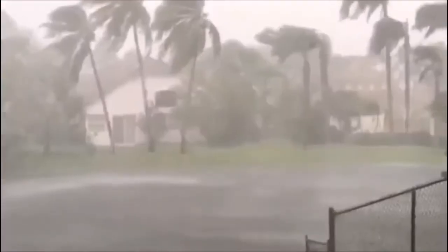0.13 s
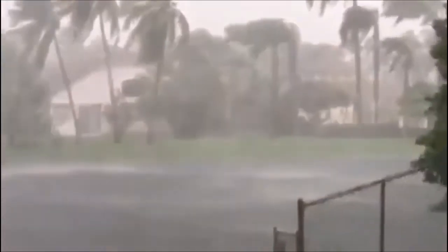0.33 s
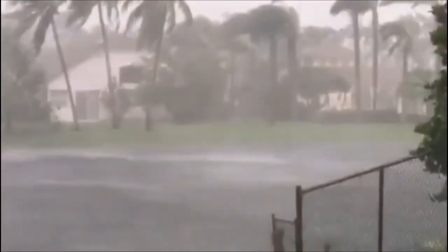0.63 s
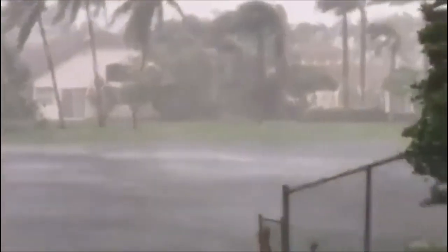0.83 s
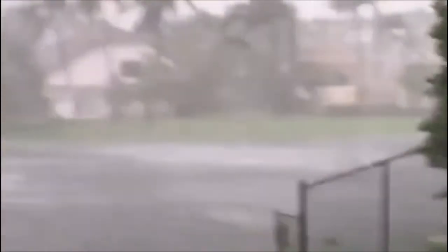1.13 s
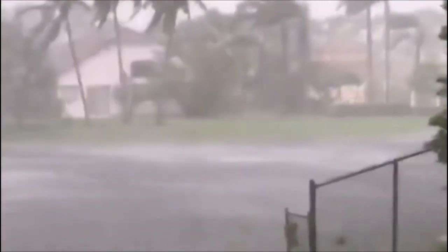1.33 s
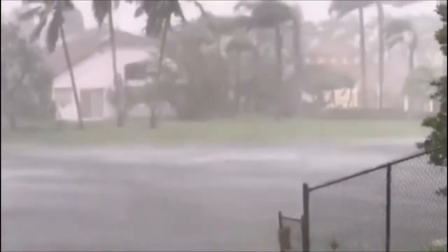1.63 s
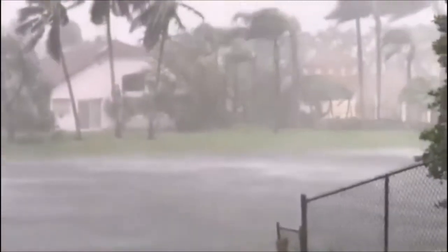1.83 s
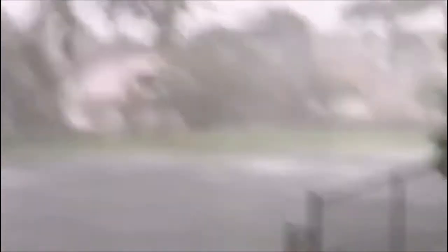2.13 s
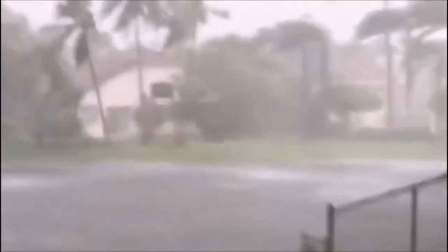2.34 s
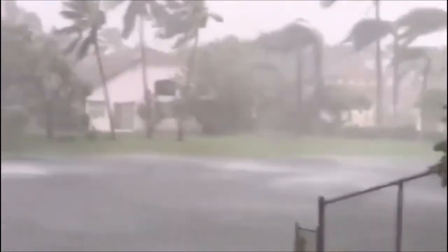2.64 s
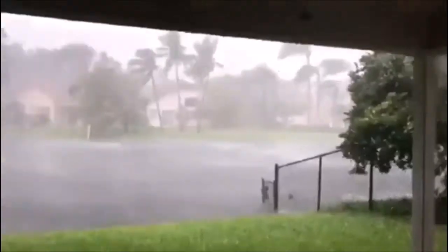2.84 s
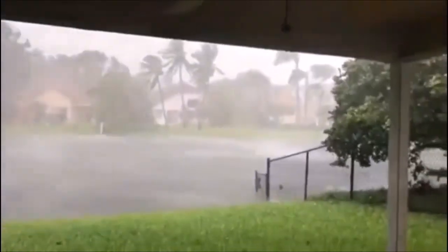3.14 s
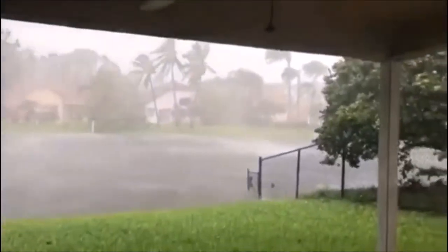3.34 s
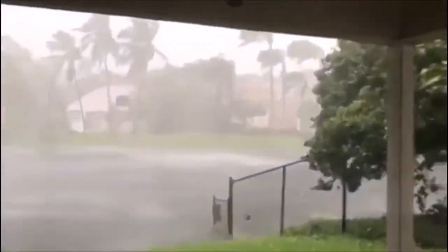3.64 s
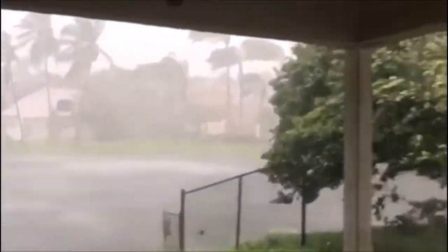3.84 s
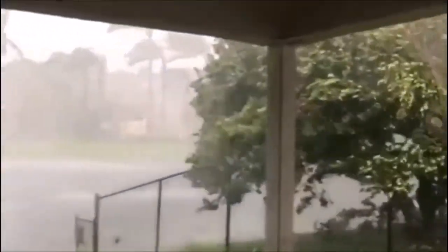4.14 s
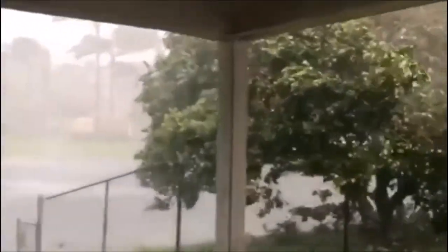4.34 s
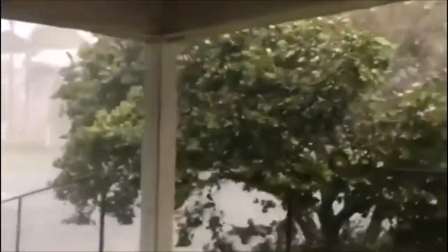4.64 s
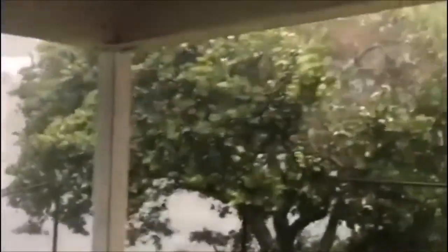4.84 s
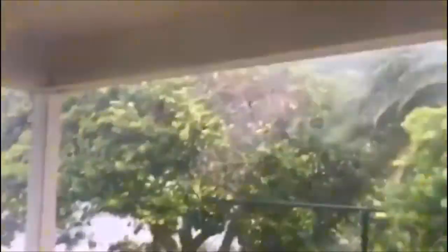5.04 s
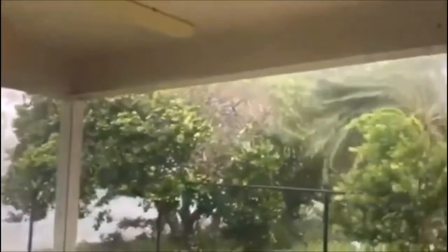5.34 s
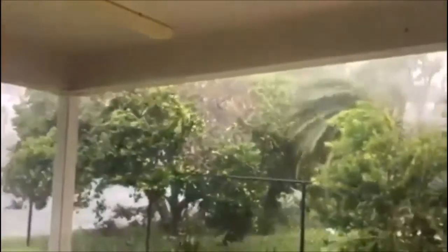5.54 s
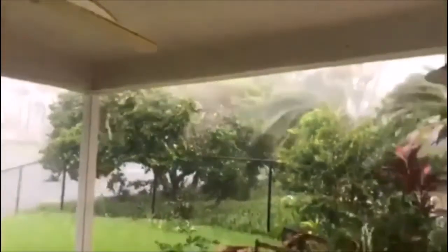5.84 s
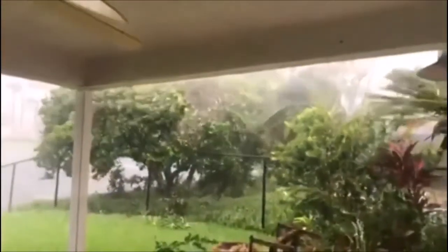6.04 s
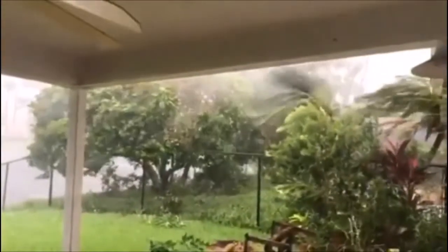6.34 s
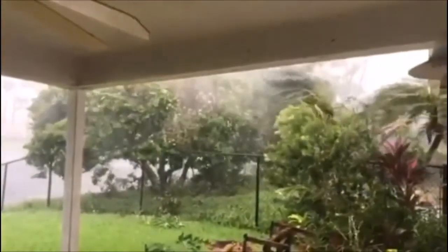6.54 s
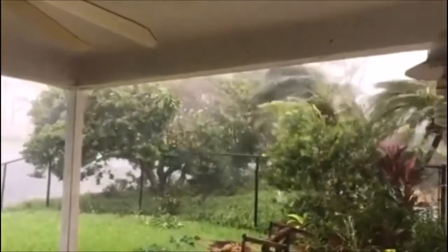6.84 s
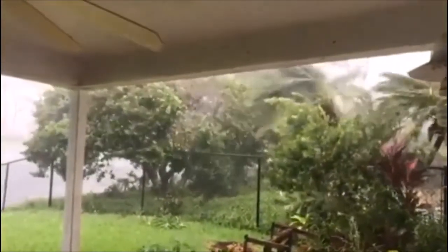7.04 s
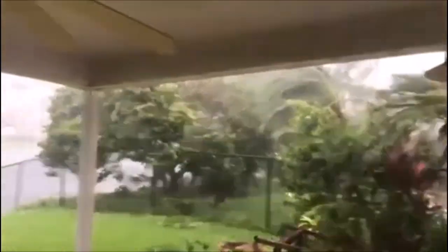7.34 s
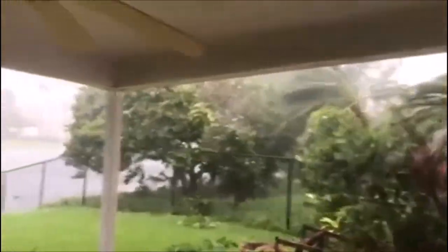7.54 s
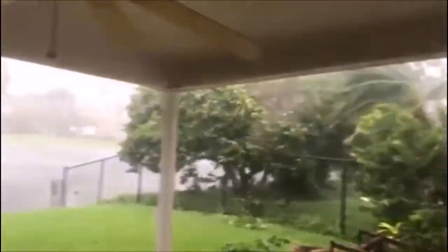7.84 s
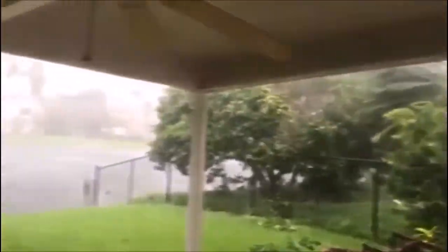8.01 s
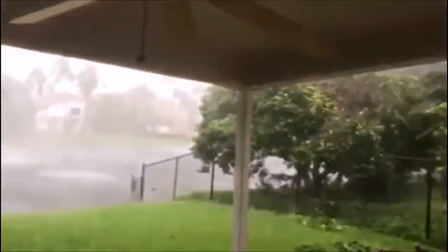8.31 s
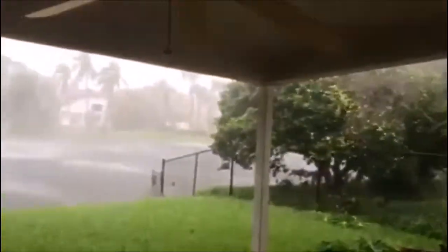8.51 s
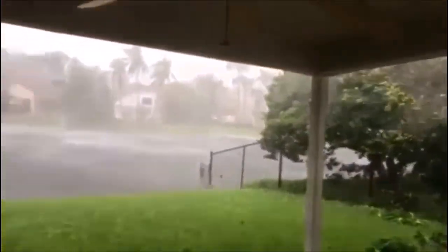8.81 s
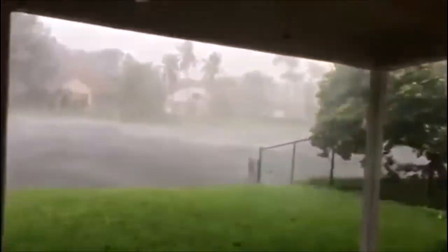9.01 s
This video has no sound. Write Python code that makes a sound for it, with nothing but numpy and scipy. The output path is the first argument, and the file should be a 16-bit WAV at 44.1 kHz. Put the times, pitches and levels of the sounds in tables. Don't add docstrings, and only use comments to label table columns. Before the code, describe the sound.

A continuous storm heard from under a porch roof beside a lawn and wide water, on one phone microphone, almost mono. From 0 to 3 seconds the wash is steady and somewhat softer: low wind rumble, mid-range roar of trees, dense grainy rain and bright spray hiss, with a faint, wavering low generator hum far away. From about 3.3 it gets louder, fullest between 4.7 and 6.3, with a heavy low gust and thump near 5.8. It eases from 6.6, quietest around 7.2, and low rumble drops near 6.9. At 7.7 rain surges back with a thump. Between 8.0 and 8.95 several short dull gust thumps hit the microphone, strongest about 8.6; low rumble then falls while the roar continues to the end, just past 9. Noise suppression makes everything shimmer waterily, with momentary thin whistling artifacts and muted treble above ten kilohertz.

```python
import sys
import numpy as np
from scipy import signal
from scipy.fft import rfft, irfft, next_fast_len
from scipy.io import wavfile
from scipy.ndimage import uniform_filter1d, map_coordinates

SR = 44100
rng = np.random.default_rng(int(sys.argv[2]) if len(sys.argv) > 2 else 0)


def persist_wave(psi):
    counts = np.round(np.clip(psi, -1, 1) * 32767).astype(np.int16)
    wavfile.write(sys.argv[1], SR, np.atleast_2d(counts).T)


def ratio(d):
    e = np.asarray(d, float) / 20
    return 10 ** e


N = 404397

HOP = 1024
PHONE_SR, PHONE_START = 48000, 474


def at_hz(points, hz):
    points = np.array(points)
    return np.interp(np.log(hz + 1), np.log(points[:, 0]), points[:, 1])


def rms_one(x):
    return x / np.sqrt(np.mean(x ** 2) + 1e-20)


def drift(rate):
    knots = rng.standard_normal(400)
    places = np.arange(0, N, 16) / SR * rate + 2
    return rms_one(map_coordinates(knots, [places], order=3)).repeat(16)[:N]


def swells(rows):
    t = np.arange(N) / SR
    return sum(db * np.cos(np.pi / 2 * np.clip((t - s) / half_s, -1, 1)) ** 2 for s, db, half_s in rows)


def patchy(source, spectrum, shared_db, own_db, rate):
    size = next_fast_len(N)
    hz = np.arange(size // 2 + 1) * SR / size
    lines = rfft(source, size) * ratio(at_hz(spectrum, hz))
    half_octave = 2 * np.log2(hz + 1)
    lowest, highest = int(2 * np.log2(spectrum[0][0])), int(2 * np.log2(spectrum[-1][0])) + 1
    together = drift(rate / 2)
    out = np.zeros(N)
    for k in range(lowest, highest + 1):
        share = np.cos(np.pi / 2 * np.clip(half_octave - k, -1, 1)) ** 2
        band = irfft(lines * share, size)[:N]
        out += band * ratio(shared_db * together + own_db * drift(rate))
    return rms_one(out)


def drops(per_s, spread_db, share):
    sizes = ratio(spread_db * np.minimum(rng.exponential(1, N), 4)) * rng.choice([-1, 1], N)
    near = rms_one(sizes * (rng.random(N) < per_s / SR))
    return np.sqrt(share) * near + np.sqrt(1 - share) * rng.standard_normal(N)


# time in seconds, wind in the trees in dB, rain on leaves and water in dB.
STORM_LEVELS = [(0.0, -33.5, -34), (0.5, -34.5, -34.5), (1.17, -33.5, -32.5), (1.63, -34.5, -34),
                (2.1, -33.5, -34), (2.45, -34, -34), (2.83, -34, -33.5), (3.47, -32, -31),
                (4.14, -32, -31.5), (4.7, -30, -29.5), (5.6, -30.5, -30), (6.25, -30.5, -29.5),
                (6.64, -32.5, -32), (7.25, -34, -34), (7.71, -31.5, -29.5), (7.9, -32, -31),
                (8.53, -30.5, -32), (9.17, -31, -31)]


def storm_level(mean_db, windy, rainy):
    s, wind_db, rain_db = np.transpose(STORM_LEVELS)
    t = np.arange(N) / SR
    wind_swing_db = np.interp(t, s, wind_db) + 32
    rain_swing_db = np.interp(t, s, rain_db) + 31.5
    return ratio(mean_db + windy * wind_swing_db + rainy * rain_swing_db)


# centre in seconds, change in dB, half length in seconds.
EDDY_SWELLS = [(3.19, 2, .15), (3.4, 5, .06), (3.8, 3, 0.1), (4.24, 2, .1), (4.6, 3.5, .15),
               (5.82, 7.5, 0.1), (5.9, -3, 0.065), (6.2, -4, .08), (6.4, 3, .15), (7.65, -1, 0.093),
               (8.52, 4, .08), (4.85, -2, .1), (1.2, -3, 0.17), (2.1, -6.5, 0.16), (6.92, -10, .1),
               (8.02, 7, .07), (8.12, -5, .08), (8.63, 3, 0.1), (8.73, -10, .06), (8.93, 2.5, .08),
               (9.17, -10, 0.21), (5.25, -2.5, .2)]


def eddies():
    return swells(EDDY_SWELLS)


# frequency in Hz, level in dB per Hz.
BUFFET_SPECTRUM = [(15, -36), (25, -17), (57, 3), (135, -0.5), (180, -28), (300, -120)]


def buffeting(eddy_db):
    air = patchy(rng.standard_normal(N), BUFFET_SPECTRUM, shared_db=0.75, own_db=-0.1, rate=8.0)
    return storm_level(-35.5, windy=0.57, rainy=0.01) * ratio(eddy_db) * air


# frequency in Hz, level in dB per Hz.
RUMBLE_SPECTRUM = [(79, -32), (135, -2), (188, -3.5), (247, -3.5), (307, -6.5), (350, -5), (450, -13.5),
                   (580, -43), (990, -120)]


def house_rumble(eddy_db):
    air = patchy(rng.standard_normal(N), RUMBLE_SPECTRUM, shared_db=-0.1, own_db=0.4, rate=8.0)
    return storm_level(-35, windy=1.2, rainy=0.01) * ratio(0.3 * eddy_db) * air


# frequency in Hz, level in dB per Hz.
TREES_SPECTRUM = [(260, -28), (450, -5), (667, -0.5), (760, -2.5), (1100, 0), (1730, -1.5), (2000, -7.5),
                  (2600, -40), (4400, -120)]


def trees():
    leaves = drops(per_s=1500.0, spread_db=1.7, share=0.1)
    roar = patchy(leaves, TREES_SPECTRUM, shared_db=0.24, own_db=0.5, rate=12.0)
    return storm_level(-32, windy=1.01, rainy=0.01) * roar


# frequency in Hz, level in dB per Hz.
RAIN_SPECTRUM = [(1180, -36), (2000, 0), (4250, -2), (4900, -8.5), (6370, -31.5), (10800, -120)]


def rain():
    patter = patchy(drops(per_s=3000.0, spread_db=2.5, share=0.16), RAIN_SPECTRUM,
                    shared_db=-0.05, own_db=0.8, rate=18.0)
    return storm_level(-33, windy=0.23, rainy=0.6) * patter


# frequency in Hz, level in dB per Hz.
SPRAY_SPECTRUM = [(2880, -32.5), (4900, -2.5), (5980, -0.5), (7670, -4.5), (9150, -4.5), (10200, -9),
                  (13400, -46), (22000, -120)]


def spray():
    hiss = patchy(drops(per_s=5000.0, spread_db=2.8, share=0.15), SPRAY_SPECTRUM,
                  shared_db=0.5, own_db=1.3, rate=22.0)
    return storm_level(-35.5, windy=-0.2, rainy=1.4) * hiss


# order (multiple of the firing rate), level in dB re the hum level, wavering in dB.
HUM_ORDERS = [(2, -2, 2), (4, -2, 1.5), (5, -2, 2), (6, -9, 2), (7, -10, 2), (8, -9, 2), (9, -10, 2)]
# order, centre in seconds, change in dB, half length in seconds.
ORDER_SWELLS = [(2, 3.9, 5, 1.3), (2, 7, -8, 2.5), (4, 1.26, 4.5, .2), (4, 1.75, -11, .2), (4, 2.4, 4, 1.1),
                (4, 5.2, -6, 0.83), (4, 8.1, -7.5, 1.6), (5, 9.1, -12, .6), (5, 7.5, -2, .3),
                (5, 1.1, -6, 1.5), (5, 4.9, 4.5, 0.7), (5, 6.3, -6, 0.67), (6, .9, 6, 0.98),
                (9, 0.63, 4, 0.65)]


def generator():
    firing_hz, hum_db = 124.2 / 4, -42
    turns = firing_hz * np.arange(N) / SR
    hum = np.zeros(N)
    for order, db, waver_db in HUM_ORDERS:
        swell_db = swells([row[1:] for row in ORDER_SWELLS if round(row[0]) == order])
        level = ratio(hum_db + db + swell_db + waver_db * drift(2.5))
        hum += np.sqrt(2) * level * np.sin(2 * np.pi * (order * turns + rng.random()))
    return hum


def lapped(x, start, count):
    n = np.arange(2 * HOP)
    window = np.sin(np.pi * (n + .5) / 2 / HOP)
    waves = np.cos(np.pi / HOP * np.outer(np.arange(count) + .5, n + .5 + HOP / 2))
    basis = waves * np.sqrt(2 / HOP) * window
    blocks = np.r_[np.zeros(HOP - start), x, np.zeros(2 * HOP)]
    blocks = blocks[:len(blocks) // HOP * HOP].reshape(-1, HOP)
    return np.hstack([blocks[:-1], blocks[1:]]) @ basis.T, basis


def overlap(lines, basis, start, size):
    frames = lines @ basis
    rising = np.r_[frames[:, :HOP].ravel(), np.zeros(HOP)]
    falling = np.r_[np.zeros(HOP), frames[:, HOP:].ravel()]
    return (rising + falling)[HOP - start:HOP - start + size]


def suppressor(lines):
    power = lines ** 2 + 1e-12
    near = uniform_filter1d(uniform_filter1d(power, size=3, axis=1), size=2, axis=0)
    steady = uniform_filter1d(uniform_filter1d(power, size=25, axis=1), size=5, axis=0)
    depth = np.interp(np.arange(lines.shape[1]), [15, 50, 90, 250, 400], [.03, .15, .23, .2, .08])
    return lines * (near / steady) ** depth


# start in seconds, low edge in Hz, high edge in Hz.
SPLIT_BANDS = [(0.131, 6900.0, 8300.0), (0.92, 5700.0, 6900.0), (1.013, 8200.0, 9700.0),
               (1.129, 5600.0, 6900.0), (1.617, 4200.0, 5200.0), (1.78, 4200.0, 5200.0),
               (2.941, 4200.0, 5200.0), (3.01, 6200.0, 8300.0), (3.637, 4600.0, 6300.0),
               (3.684, 5100.0, 6900.0), (3.823, 5600.0, 6900.0), (4.078, 5600.0, 7600.0),
               (4.287, 6900.0, 10300.0), (4.705, 4200.0, 5200.0), (4.798, 5100.0, 6900.0),
               (4.798, 8900.0, 10400.0), (4.961, 6900.0, 8300.0), (5.146, 8900.0, 10300.0),
               (6.307, 8900.0, 10400.0), (6.795, 5600.0, 6900.0), (7.05, 4200.0, 5200.0),
               (7.167, 5100.0, 6300.0), (7.956, 6200.0, 8300.0), (9.14, 4200.0, 5200.0),
               (9.14, 7200.0, 9600.0)]


def ear_difference(x):
    start = 160
    lines, basis = lapped(x, start, count=490)
    side = np.zeros_like(lines)
    for s, low_hz, high_hz in SPLIT_BANDS:
        k = round(((s + .012) * SR - start) / HOP)
        low, high = round(low_hz * 2 * HOP / SR), round(high_hz * 2 * HOP / SR)
        band = lines[k, low:high]
        side[k, low:high] = ratio(-3.5) * band.std() * rng.standard_normal(band.shape)
    return overlap(side, basis, start, N)


# time in seconds, number of lines kept.
STARVED_FRAMES = [(1.695, 19), (1.759, 13), (2.207, 23), (2.421, 9), (2.783, 17), (3.423, 24), (4.021, 13),
                  (4.063, 13), (4.533, 15), (5.13, 7), (5.535, 19), (5.791, 12), (5.813, 13), (5.855, 23),
                  (5.919, 5), (6.367, 13), (6.495, 21), (6.517, 10), (6.602, 9), (7.882, 14), (8.074, 14),
                  (8.309, 14), (8.565, 15), (8.586, 16), (8.607, 16), (8.629, 23)]


def starve(lines, hz, recovery_s):
    out = lines.copy()
    step = ratio(at_hz([(1500, 0), (4000, -2.5), (9000, -8.5)], hz))
    for s, kept in list(STARVED_FRAMES) + [(recovery_s + .012, 16)]:
        k = round((s * PHONE_SR - PHONE_START) / HOP)
        strength = np.abs(lines[k]) / step
        edge = np.sort(strength)[-int(kept)]
        rounded = np.sign(lines[k]) * step * 2 * edge * np.floor(strength / edge / 2 + .5)
        out[k] = rounded + ratio(-41) * lines[k]
    return out


# time in seconds, peak in dB, pitch in Hz.
GUST_THUMPS = [(5.512, -22, 140), (5.805, -18.5, 109), (7.683, -18, 188), (8.03, -22.5, 137),
               (8.212, -19.5, 170), (8.3, -18, 156), (8.54, -21, 250), (8.585, -21, 240), (8.644, -16, 111),
               (8.645, -19, 420), (8.659, -23, 160), (8.918, -16.5, 215), (8.931, -22, 170),
               (8.95, -21, 123.4)]


def thumps():
    half = 1500
    out, t = np.zeros(N), np.arange(-half, half) / SR
    for s, db, hz in GUST_THUMPS:
        push = -np.cos(2 * np.pi * hz * t) * np.exp(-np.abs(t * hz / 0.42))
        at = round((s + .0008) * SR)
        out[at - half:at + half] += ratio(db + 1.5) * push
    return out


def phone(x):
    full_lines, stray_from, count = 445, 452, 465
    recovery_s = 8.638
    fast = signal.resample_poly(x, 160, 147)
    lines, basis = lapped(fast, PHONE_START, count)
    lines = suppressor(lines)
    hz = (np.arange(count) + .5) * PHONE_SR / 2 / HOP
    stray_frames = rng.random((len(lines), 1)) < .13
    stray = stray_frames * (rng.random(lines.shape) < .14) * (np.arange(count) > stray_from)
    stray_lines = ratio(-35) * stray * rng.choice([-1, 1], lines.shape)
    lines[:, full_lines:] = stray_lines[:, full_lines:]
    full = overlap(lines, basis, PHONE_START, len(fast))
    poor = overlap(starve(lines, hz, recovery_s), basis, PHONE_START, len(fast))
    since = np.arange(len(fast)) / PHONE_SR - recovery_s
    recovered = np.clip(since / .0027 + .5, 0, 1)
    return signal.resample_poly(poor + recovered * (full - poor), 147, 160)[:N]


def scene():
    eddy_db = eddies()
    wind = buffeting(eddy_db) + house_rumble(eddy_db) + trees()
    water = rain() + spray()
    return np.tile(wind + water + generator() + thumps(), (2, 1))


def top_cut(x):
    return signal.sosfilt(signal.butter(12, 10990, fs=SR, output="sos"), x)


def record(dry):
    bass_cut = signal.butter(2, 36.0, "high", fs=SR, output="sos")
    mono = phone(signal.sosfilt(bass_cut, dry[0]))
    side = ear_difference(mono)
    return top_cut(np.array([mono + side, mono - side]))


dry = scene()
out = record(dry)
persist_wave(out)
```